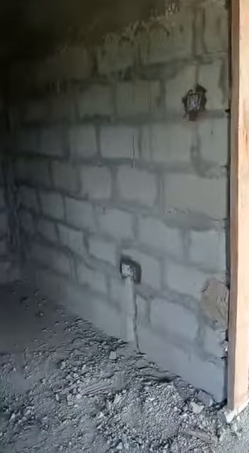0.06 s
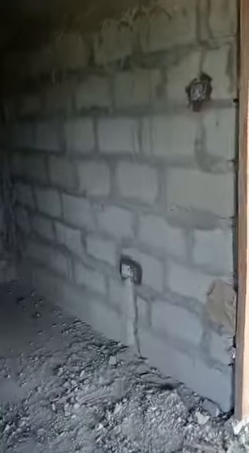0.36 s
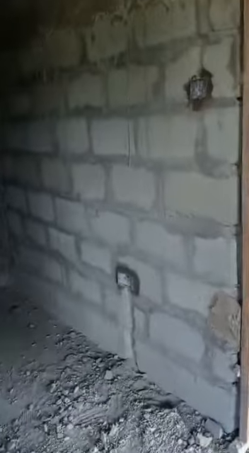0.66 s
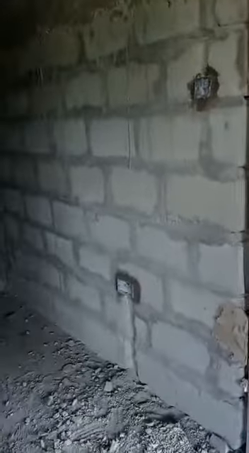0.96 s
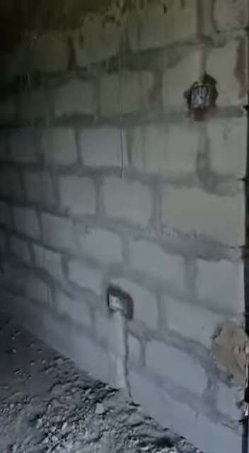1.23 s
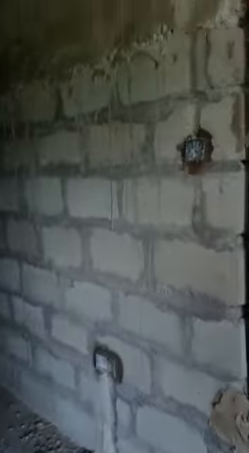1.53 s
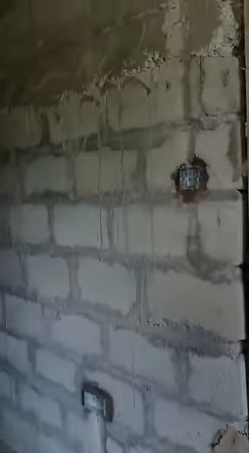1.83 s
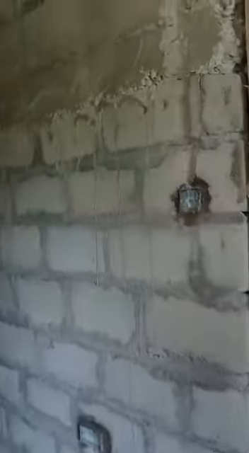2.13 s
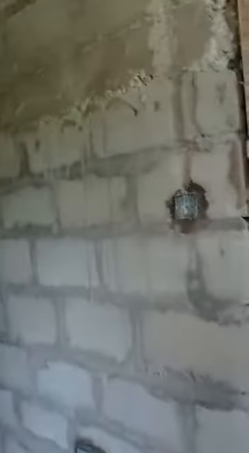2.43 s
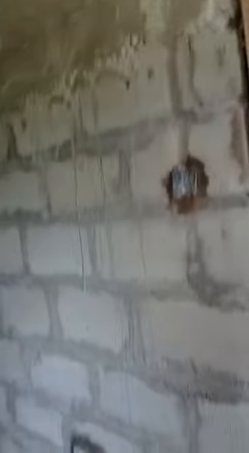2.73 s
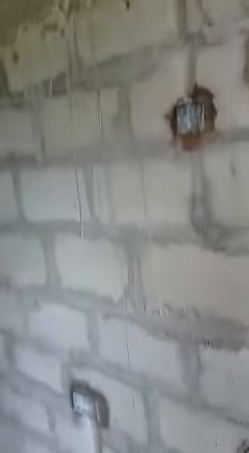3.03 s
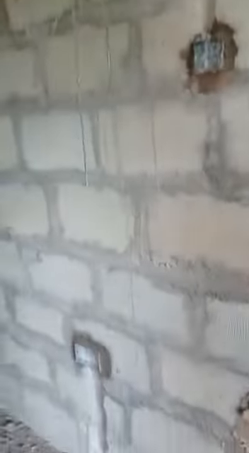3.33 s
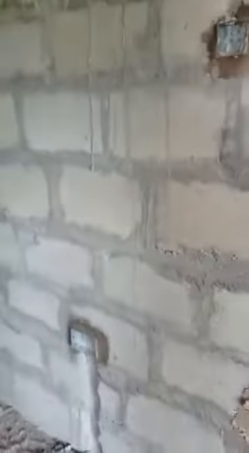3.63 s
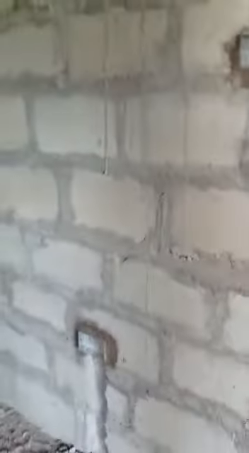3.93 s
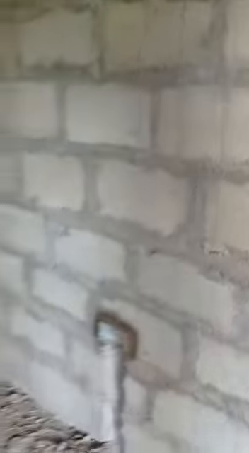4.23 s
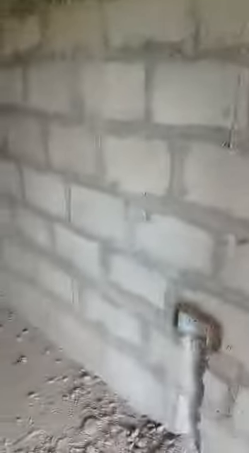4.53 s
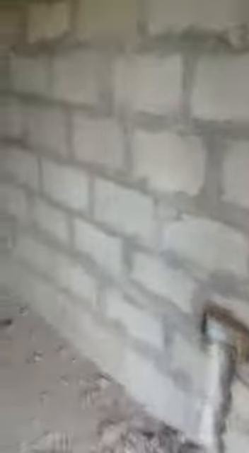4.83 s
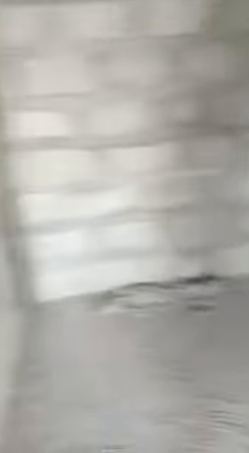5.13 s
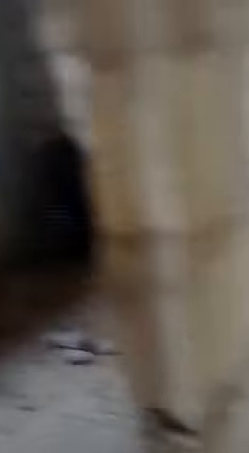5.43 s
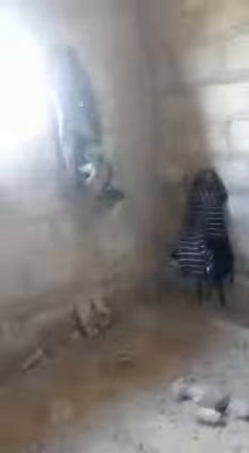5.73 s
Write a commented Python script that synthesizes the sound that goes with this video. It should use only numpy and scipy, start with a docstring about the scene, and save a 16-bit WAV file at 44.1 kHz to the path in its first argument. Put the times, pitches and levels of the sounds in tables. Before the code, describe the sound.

A hammer strikes a steel chisel into a concrete-block wall inside a bare, unfinished building. Hard blows land at about 0.1, 0.8 and 1.6 seconds, each combining a knock, a sharp crack of mortar, a brief high metallic ring and a low thump that echoes for about a second. A pause follows, with faint gritty scrapes and trickling grains. A lighter tap comes at 3.2 seconds, a short scrape and a snapping chip at 3.4, and a very light tap at 4.0. Hard blows resume at 4.3, 5.1 and 5.9 seconds. The microphone is carried through the next room towards the work, so these sound more direct, with a heavier thump. A few soft, low footsteps fall around 0.6, 2, 4.2 and 5 seconds. Tiny chips tick between the blows, and a very faint outdoor rumble lies underneath throughout.

```python
"""Sharp, ringing hammer blows echo through a bare building, about one every 0.8 s, with a pause and
two light taps. The hammer drives a steel chisel into a block wall: each blow thumps the wall, knocks
a block, cracks mortar and rings the chisel. In between, grit scrapes, chips snap and feet step softly.
A phone is carried through the next room towards the work; the far rooms boom back late, and the
phone turns itself down a little on the hard blows."""
import sys
import numpy as np
from scipy import signal
from scipy.fft import rfft, irfft, next_fast_len
from scipy.io import wavfile
from scipy.ndimage import minimum_filter1d

SR = 44100
rng = np.random.default_rng(int(sys.argv[2]) if len(sys.argv) > 2 else 0)


def dump(signal):
    """Clip the signal to [-1, 1] and save it as 16-bit WAV at the path in sys.argv[1]."""
    limited = np.clip(np.atleast_2d(signal).T, -1, 1)
    pcm = np.round(limited * 32767).astype(np.int16)
    wavfile.write(sys.argv[1], SR, pcm)


N = 263277
EVENT_SAMPLES = 2 ** 16  # room for one sound and its echo
T = np.arange(EVENT_SAMPLES) / SR


# How the sound changes as the phone moves: t/s, direct knock/dB, direct treble/dB (both against
# the first bounce), extra thump/dB, late boom/dB (against the thump)
PHONE_WALK = [(.4, -5, -21, -4, 3), (1.7, 8, -8.5, -4, -3.5), (3.3, -3, -12, -1, -6.5),
              (4.5, -7, -8, 0, -4.5), (5.2, -5.5, -5.5, 1, -10.5), (5.9, 0, -1, 5.5, -13)]
# The hammer blows: t/s, force/dB (0 is an ordinary blow), knock f/Hz,
# extra knock/dB, extra ring/dB near 4 kHz, near 6 kHz, near 8 kHz
HAMMER_BLOWS = [ (0.0625, -.5, 593, -3, 7.5, 3, -29), (0.8311, -.5, 710, 1.5, 4.5, -4.5, -12.5),
                (1.6151, 1.16, 736, -2.5, 1, -3.5, -13.5), (3.2447, -7.5, 392, -6, -14, -5, -10),
                (3.9634, -19.5, 291, -2.5, -11, 0.5, -16), (4.3380, 0.64, 598, 4.5, 2, -1.5, -3),
                (5.1260, 1.4, 908, 4, -2.5, 0, -14), (5.8679, 2, 654, 1, -10, -18, -4)]
def blow(s, force_db, knock_hz, knock_db, *ring_db):
    """One hammer blow. A harder hit has a shorter contact, so its treble grows faster than its bass."""
    times, *columns = np.transpose(PHONE_WALK)
    low_direct_db, high_direct_db, thump_db, late_db = (np.interp(s, times, c) for c in columns)
    echo = reverb(far_db=-11, far_s=.082)
    # long waves bounce cleanly; the rough blocks scatter the treble
    low_path = near_walls(low_direct_db, scatter_db=-7)
    high_path = near_walls(high_direct_db, scatter_db=9.5)
    treble = mortar_crack(force_db, high_path, echo) + chisel_ring(*ring_db, high_path, echo)
    body = wall_thump(thump_db, late_db) + block_knock(knock_hz, knock_db, low_path, echo)
    return undb(force_db) * body + undb(1.72 * force_db) * treble


# The tones of a struck block: multiple of the knock's pitch, level/dB, fade time/s for a 510 Hz knock
BLOCK_TONES = [(.76, -8.5, 0.064), (1, 6.5, 0.04), (1.129, -3.5, 0.18), (1.85, -9.5, 0.024)]
def block_knock(knock_hz, extra_db, path, echo):
    """The struck block knocks, shaking the same number of times whatever its pitch."""
    knock = 0
    for ratio, db, t60 in BLOCK_TONES:
        tone = mode(knock_hz * ratio, t60 * 510 / knock_hz)
        knock += undb(db) * in_room(tone, path, echo, echo_db=-3)
    return level(knock, -22.5 + extra_db)


# Low notes that build up between the walls (standing waves): f/Hz, level/dB, fade time/s
ROOM_TONES = [(80, -12, 1.66), (166.6, -9, 0.92), (183, -16.5, 0.53), (245.3, -14.5, 0.42)]
# How strong a thump is from low to high: f/Hz, level/dB
THUMP_SPECTRUM = [(25, -36), (48, -21.5), (75, -8), (115, -3.5), (185, 1.5), (300, -4.5), (450, -2.5),
                  (700, -7.5), (1200, -16), (3000, -49.5)]
def wall_thump(extra_db, late_db):
    """The wall booms and sets the room humming; the far rooms answer late."""
    boom = unit(colour(reverb(far_db=late_db, far_s=.093), THUMP_SPECTRUM, tilt_db=.5))
    hum = sum(undb(db) * mode(hz * jitter(.011), t60) for hz, db, t60 in ROOM_TONES)
    thump = boom * np.hypot(1, undb(late_db)) + undb(.5) * hum
    rebound = unit(colour(burst(t60=.12), THUMP_SPECTRUM, tilt_db=-1))
    add(thump, .126, undb(late_db - 4.5) * rebound)  # a far wall throws the thump back once
    return thump * undb(-24.5 + extra_db) * np.sqrt(SR / 10)


# How strong the crack is from low to high: f/Hz, level/dB
CRACK_SPECTRUM = [(200, -24), (600, 16.5), (1100, 11), (1700, 3.5), (2500, 5.5), (3300, -0.5), (4300, 1.5),
                  (5200, 0), (6600, 5.5), (8600, -44), (10500, -38.5), (13600, -24), (15300, -25),
                  (17000, -25)]
def mortar_crack(force_db, path, echo):
    """Mortar breaks with one echoing click, brighter when the blow is harder."""
    crack = colour(path + echo, CRACK_SPECTRUM, tilt_db=1 + .08 * force_db)
    return level(crack, -26.5)


# The tones of the steel chisel: f/Hz, level/dB, fade time/s
CHISEL_TONES = [(3940, -8.5, 0.028), (3805, -12, 0.059), (4210, -5, 0.018), (4530, -14, .015),
                (5600, -13, 0.043), (6070, -9, 0.023), (6160, -5.5, 0.06), (6120, -18.5, 0.077),
                (6850, -27, 0.075), (7350, -5, 0.036), (7830, -4.5, 0.071), (7760, -18, 0.032),
                (11500, -33, .015), (12500, -36.5, .015), (14600, -36, 0.01), (15300, -27, .03),
                (17100, -20.5, .04)]
def chisel_ring(db_4k, db_6k, db_8k, path, echo):
    """The steel rings; the spot where the hammer lands favours some tones over others."""
    favour = [(4500, db_4k), (5600, db_6k), (6700, db_6k), (7400, db_8k), (8000, db_8k), (11000, 4)]
    ring = 0
    for hz, db, t60 in CHISEL_TONES:
        tone = mode(hz * jitter(.0064), t60)  # the grip shifts the pitch slightly
        ring += level(in_room(tone, path, echo, echo_db=5), -30.5 + db + along(favour, hz))
    return ring


# How strong grit is from low to high: f/Hz, level/dB
GRIT_SPECTRUM = [(100, -34), (400, -9), (900, -3), (1500, -0.5), (2500, 1), (4200, 1), (6600, 0.5),
                 (8200, -16.5), (11000, -28), (16000, -28)]
# Grit scraping on the floor: t/s, length/s, level/dB
GRIT_SCRAPES = [(-.04, 0.097, -53), (.51, 0.095, -46.5), (1.12, 0.14, -49), (1.45, 0.15, -52.5),
                (1.79, .12, -40), (2.04, 0.15, -49), (2.25, 0.096, -58.5), (2.46, 0.2, -58.5),
                (2.73, 0.13, -51.5), (3.368, 0.057, -32.5), (3.77, 0.12, -44.5), (4.67, 0.12, -48.5),
                (4.91, 0.083, -53.5), (5.31, 0.048, -49), (5.56, 0.048, -55)]
def scrape(length_s, db):
    """Tiny grains rub over concrete in a short swell, and the room echoes it."""
    swell = np.sin(np.pi * np.minimum(T / length_s, 1))
    rubbing = grains(EVENT_SAMPLES, per_s=5400, spread_db=2.5) * swell
    grit = colour(rubbing, GRIT_SPECTRUM, tilt_db=-2.1)
    return level(undb(7) * grit + through(grit, reverb()), db)


# How strong a chip's snap is from low to high: f/Hz, level/dB
CHIP_SPECTRUM = [(200, -12), (900, -8), (1500, 8), (2400, -2.5), (4000, 4), (6000, -7), (8000, -21.5),
                 (11000, -30.5), (16000, -36.5)]
# The larger chips of mortar: t/s, level/dB
MORTAR_CHIPS = [(.512, -56.5), (.706, -54.5), (.757, -55), (1.447, -54), (2.044, -57), (2.176, -56),
                (2.756, -61.5), (3.397, -37.5), (3.624, -49.5), (3.758, -55.5)]
def chip(db):
    """A chip of mortar snaps close by."""
    snap = colour(burst(t60=.016), CHIP_SPECTRUM)
    return level(snap + undb(-7.5) * through(snap, reverb()), db)


# Soft footsteps: t/s, level/dB
FOOTSTEPS = [(.52, -45.5), (.68, -46.5), (2.06, -48.5), (4.15, -50), (5.0, -53.5)]
def footstep(db):
    """A foot lands softly, heard as a low boom of the room."""
    return level(colour(reverb(), THUMP_SPECTRUM, tilt_db=-3), db)


# How the trickle of grit swells and sinks: t/s, relative level/dB
TRICKLE_LEVELS = [(0, -56), (.7, -59), (1.3, -59.5), (2.6, -60.5), (3.05, -83.5), (3.7, -51), (4.1, -70.5),
                  (4.85, -52), (5.1, -77), (5.7, -78.5), (5.82, -57)]
def trickle():
    """Loose grains keep ticking onto the floor."""
    grit = colour(grains(N, per_s=560, spread_db=5), GRIT_SPECTRUM, tilt_db=-1)
    swell_db = np.interp(np.arange(N) / SR, *np.transpose(TRICKLE_LEVELS))
    grit = grit / np.std(grit) * undb(swell_db)
    return undb(-4.5) * grit + undb(-6.5) * through(grit, reverb())


# How strong the outdoor rumble is from low to high: f/Hz, level/dB
AIR_SPECTRUM = [(20, -40.5), (40, -4.5), (56, 21), (90, -12.5), (200, -3.5), (430, 11), (900, -6),
                (2000, -23.5), (6000, -22.5), (9000, -38), (16000, -43.5)]
def outdoor_air(db=-61):
    """The outdoors rumbles faintly through the open windows."""
    noise = colour(rng.standard_normal(N), AIR_SPECTRUM)
    return noise / np.std(noise) * undb(db)


BOUNCE_GAP_S = .008
# The first three bounces between close walls: level/dB
WALL_BOUNCES = [0, -1.5, -9]
def near_walls(direct_db, scatter_db):
    """Sound arrives directly, then bounces between close walls, smeared by the rough blocks."""
    path = np.zeros(EVENT_SAMPLES)
    for k, db in enumerate([direct_db, *WALL_BOUNCES]):
        arrival = undb(scatter_db) * unit(burst(t60=.021))
        arrival[0] += 1  # the clean part, ahead of the smear
        add(path, k * BOUNCE_GAP_S * jitter(.018), arrival * undb(db))
    return unit(path)


# How long the building echoes at each pitch: f/Hz, fade time/s
ECHO_TIMES = [(80, 1.25), (170, 0.85), (400, 0.91), (800, 0.58), (2000, 0.67), (4000, 0.51), (6300, 0.42),
              (8000, 0.35), (11000, 0.22), (16000, 0.095)]
def reverb(far_db=-30, far_s=.118):
    """The echo of bare walls: the treble dies first, and the far rooms add a second, later wave."""
    noise = rfft(rng.standard_normal(EVENT_SAMPLES))
    hz = np.arange(len(noise)) * SR / EVENT_SAMPLES
    centres, t60s = np.transpose(ECHO_TIMES)
    echo = 0
    for one_band, t60 in zip(np.eye(len(t60s)), t60s):
        band = irfft(noise * along(np.c_[centres, one_band], hz))
        near = fade(t60) * (1 - np.exp(-T / BOUNCE_GAP_S))
        far = undb(far_db) * np.interp(T - far_s, T, near)
        echo += band * np.hypot(near, far)
    return unit(echo)


def in_room(x, path, echo, echo_db):
    """A sound with its first bounces and its echo."""
    return unit(through(x, path)) + undb(echo_db) * unit(through(x, echo))


def through(x, echoes):
    """Play a sound through a pattern of echoes."""
    return signal.fftconvolve(x, echoes)[:len(x)]


def grains(size, per_s, spread_db):
    """Random tiny impacts, a few much larger than the rest."""
    hits = (rng.random(size) < per_s / SR) * rng.choice([-1, 1], size)
    return hits * undb(spread_db * np.minimum(rng.exponential(size=size), 5))


def fade(t60):
    """Die away by 60 dB in t60 seconds, the fade time."""
    return np.exp(-np.log(1000) * T / t60)


def mode(hz, t60):
    """One fading tone of a struck object."""
    return unit(np.sin(2 * np.pi * hz * T) * fade(t60))


def burst(t60):
    """A fading puff of noise."""
    return rng.standard_normal(EVENT_SAMPLES) * fade(t60)


def jitter(spread):
    """A random factor close to one."""
    return 1 + spread * rng.standard_normal()


def colour(x, spectrum, tilt_db=0):
    """Shape a sound's bass and treble; tilt_db brightens it by that many dB per octave."""
    size = 2 * next_fast_len(len(x), real=True)
    hz = np.arange(size // 2 + 1) * SR / size
    gain = undb(along(spectrum, hz) + tilt_db * np.log2(hz + 20))
    # fold the filter forward in time, so nothing sounds before the hit
    cepstrum = irfft(np.log(gain))
    cepstrum[1:size // 2] *= 2
    cepstrum[size // 2 + 1:] = 0
    return irfft(rfft(x, size) * np.exp(rfft(cepstrum)))[:len(x)]


def along(points, hz):
    """Read between (f/Hz, value) points, with octaves evenly spaced."""
    f, value = np.transpose(points)
    return np.interp(np.log(hz + 1), np.log(f), value)


def undb(db):
    """Turn decibels into a volume factor."""
    return 10 ** (np.asarray(db) / 20)


def unit(x):
    """Scale to an energy of one."""
    return x / np.sqrt(np.sum(x ** 2))


def level(x, db):
    """Give a short sound the energy of a tenth of a second at this level."""
    return unit(x) * undb(db) * np.sqrt(SR / 10)


def add(out, s, x):
    """Mix x into out, starting at s seconds."""
    i = int(round(s * SR))
    x, i = x[max(-i, 0):], max(i, 0)
    out[i:i + len(x)] += x[:len(out) - i]


def scene():
    """Blows, scrapes, chips and footsteps over trickling grit and a faint rumble."""
    out = outdoor_air() + trickle()
    for s, *row in HAMMER_BLOWS:
        add(out, s, blow(s, *row))
    for table, source in (GRIT_SCRAPES, scrape), (MORTAR_CHIPS, chip), (FOOTSTEPS, footstep):
        for s, *row in table:
            add(out, s, source(*row))
    return out[None]


def smooth(x, seconds):
    """Follow x with a lag, evening out quick changes."""
    memory = np.exp(-1 / (seconds * SR))
    return signal.lfilter([1 - memory], [1, -memory], x)


def gain_control(x, threshold_db=-16, slope=.25, attack_s=.015, hold_s=.05, release_s=.02):
    """The phone turns loud sounds down, waits, then recovers; the start of a crack slips through."""
    loudness_db = 10 * np.log10(smooth(x ** 2, attack_s) + 1e-12)
    cut_db = slope * np.maximum(loudness_db - threshold_db, 0)
    hold = int(hold_s * SR)
    held_db = -minimum_filter1d(-cut_db, hold, origin=(hold - 1) // 2, mode="constant")
    held_db = np.maximum(held_db, smooth(held_db, release_s))
    return x * undb(-smooth(held_db, attack_s))


def record(dry, bass_hz=52, top_hz=15900):
    """The phone drops the deep bass, turns down and rounds the peaks, and cuts the highest treble."""
    bass_cut = signal.butter(3, bass_hz, "highpass", fs=SR, output="sos")
    top_cut = signal.ellip(8, .2, 70, top_hz, fs=SR, output="sos")
    thin = signal.sosfilt(bass_cut, dry)
    rounded = np.tanh(gain_control(thin))
    return signal.sosfilt(top_cut, rounded)


dry = scene()
out = record(dry)
dump(out)
```